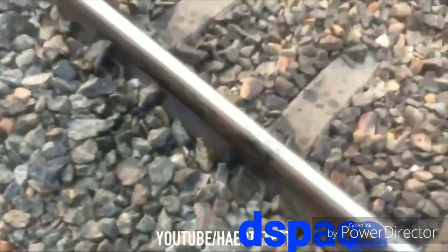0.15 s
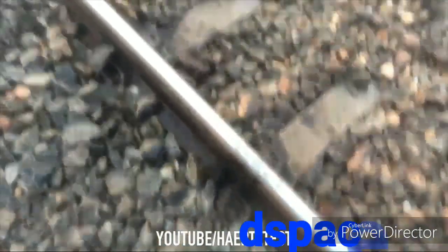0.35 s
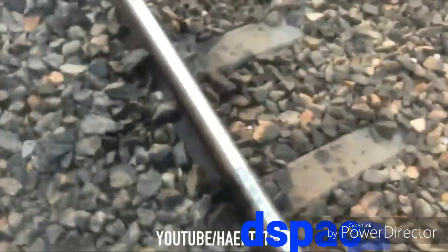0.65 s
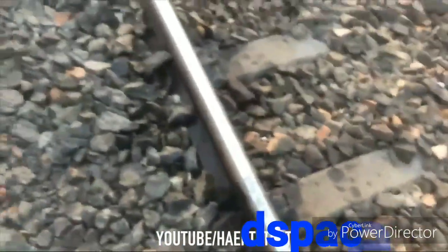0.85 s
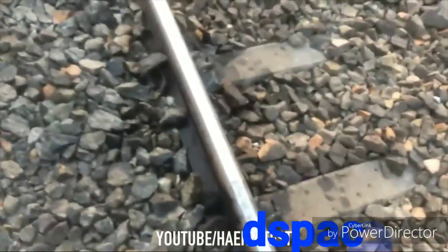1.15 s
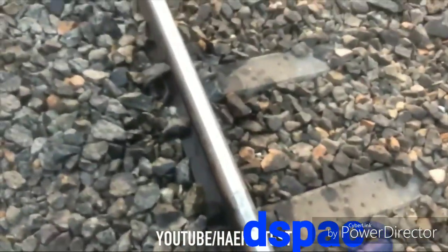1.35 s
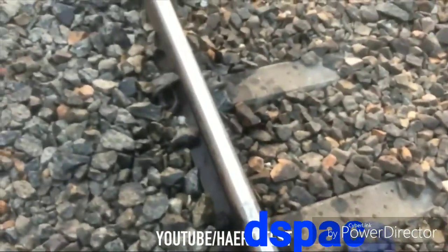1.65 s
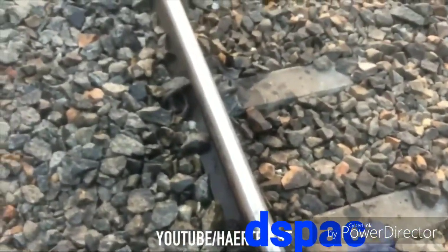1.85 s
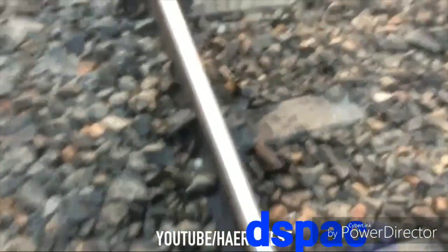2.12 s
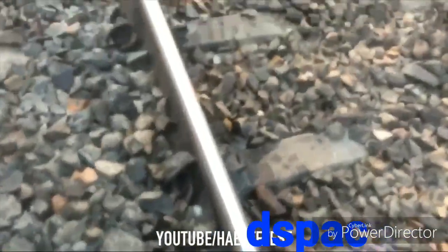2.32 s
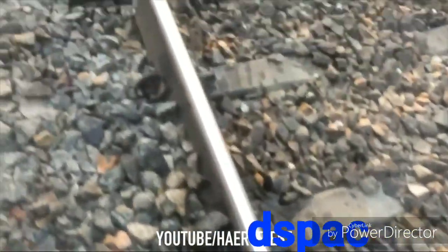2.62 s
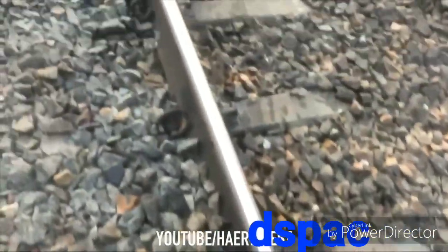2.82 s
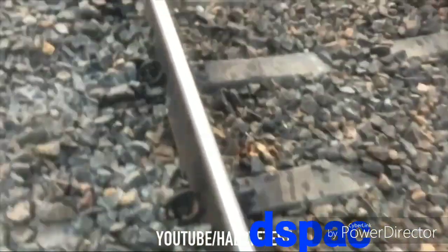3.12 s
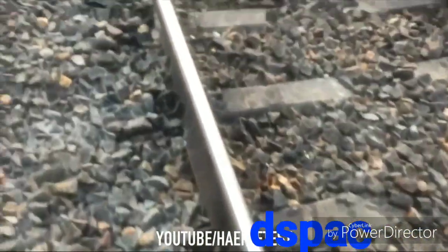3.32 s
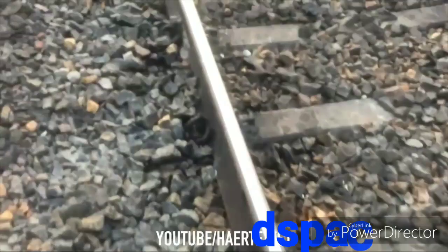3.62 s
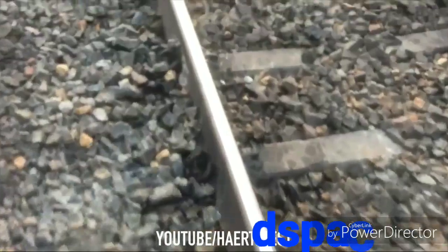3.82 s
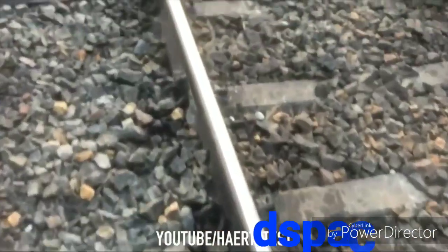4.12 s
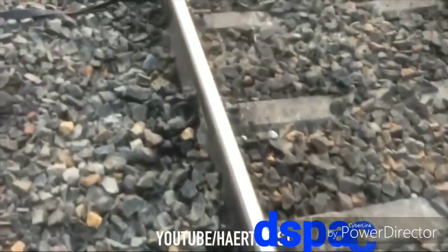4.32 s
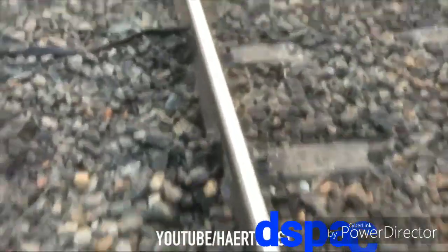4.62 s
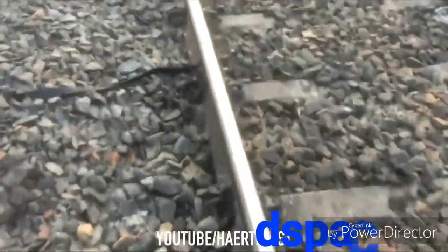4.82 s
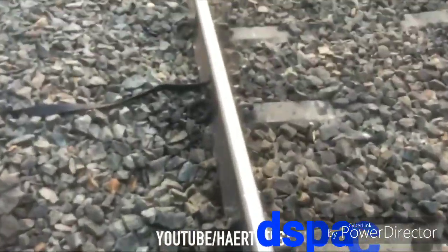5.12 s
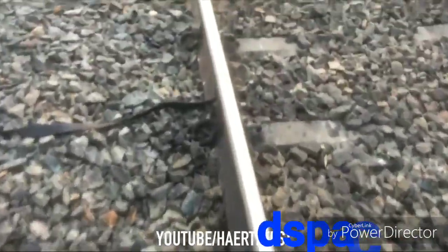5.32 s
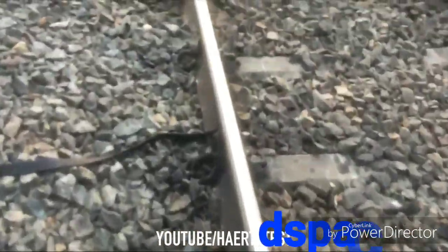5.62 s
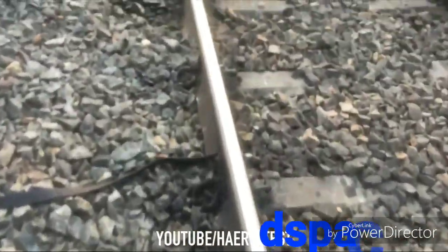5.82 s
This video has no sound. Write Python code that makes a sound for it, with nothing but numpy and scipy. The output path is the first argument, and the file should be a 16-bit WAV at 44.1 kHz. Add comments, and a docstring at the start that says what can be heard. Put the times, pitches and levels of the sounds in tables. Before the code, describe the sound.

Slow, crunching steps on loose railway ballast, stones knocking and grinding close to the microphone, with light wind buffeting and a faint distant engine.

```python
"""Beside a railway, outdoors: slow steps on loose ballast, close to a hand-held microphone.
Stones slip, knock, grind and rock underfoot, noisy or impulsive forces driving damped resonances; brief
narrow-band rings, some very high, lie over them. Air buffets the microphone in short pressure swings
over a low, gusting rumble of filtered noise. Behind lie a distant engine, three wavering harmonics,
and a faint steady background of coloured noise: a low murmur with a little hiss."""
import sys
import numpy as np
from scipy import signal
from scipy.fft import rfft, irfft
from scipy.io import wavfile
from scipy.ndimage import uniform_filter1d

SR = 44100
rng = np.random.default_rng(int(sys.argv[2]) if len(sys.argv) > 2 else 0)


def bounce(signal):
    """Save signal as a 16-bit WAV file at the path given by the first command-line argument."""
    frames = np.transpose(np.atleast_2d(signal))
    limited = np.clip(frames, -1, 1)
    pcm = np.round(limited * 32767).astype(np.int16)
    wavfile.write(sys.argv[1], SR, pcm)


N = 262395  # length in samples
TAPS = 2048  # length of one contact sound in samples
HZ = np.fft.rfftfreq(TAPS, 1 / SR) + 1  # the offset keeps the logarithm finite

# A stone slips over its neighbours. Each row: snap time in seconds, energy in dB, pitch in Hz,
# thud in dB re the ring, grit in dB re the ring, decay of the chatter in seconds.
SLIPS = [(0.0272, -17.5, 2800, -12, 3, 0.0034), (0.048, -28.5, 1820, -10, -11, 0.006),
         (0.1728, -15, 2970, 12, 6.5, 0.0039), (0.1866, -23, 3130, 4.5, 5.5, 0.0068),
         (0.2851, -19, 2180, -29, -32, 0.0045), (0.3433, -20, 2500, 1, -19, 0.0027),
         (0.4772, -3, 1970, -7.5, -4.5, 0.0031), (0.5105, -14.5, 2360, -9.5, -17, 0.004),
         (0.5738, -23.5, 2350, 3.5, 10, 0.0031), (0.6171, -27.5, 4500, -6, -10, 0.0047),
         (0.6589, -22.5, 2340, -19, -7, .0021), (0.6927, -13.5, 1690, -14, 1.5, 0.0025),
         (0.7117, -18.5, 1770, -27, 1, 0.00081), (0.782, -14, 1900, -34, -14, 0.0064),
         (0.8517, -15, 2830, -25, -23, 0.00076), (0.8564, -8.5, 3130, -14.5, -6, 0.0021),
         (0.94, -13, 2700, -15, -11, 0.0096), (0.948, -12, 2200, -12, -5, 0.0056),
         (0.977, -27, 3410, -15, -19, 0.00099), (1.3704, -16, 2060, -4, -2.5, 0.0036),
         (1.617, -35.5, 3560, -25, -8, 0.0022), (1.703, -23, 3440, -8, -14, 0.0032),
         (1.7518, -23, 1860, -3, 7, 0.0016), (1.8175, -13, 1500, -8, 9.5, 0.0018),
         (1.838, -23, 3620, -8, -11, .0022), (2.1802, -14, 2290, -23, -4.5, 0.0042),
         (2.219, -13.5, 2250, -11, -3, 0.0024), (2.2538, -23, 1970, -5, -4, 0.0031),
         (2.28, -17.5, 2280, -6.5, -16, 0.0068), (2.3337, -15, 2150, -26, -5.5, 0.0092),
         (2.399, -19, 2880, -41, -22, .0047), (2.449, -16, 2030, -13, -20, 0.00075),
         (2.556, -17, 1984, -8, -9, 0.003), (2.6563, -20.5, 2520, -16, -10, 0.0031),
         (2.7086, -23.5, 2400, -17, -12, .0026), (2.7493, -13, 2160, -22, -1, 0.0075),
         (2.7777, -24, 2310, -18, -16, 0.0037), (3.054, -21, 3500, -20, 16, .0032),
         (3.0748, -9, 2430, -11, -0.5, 0.0017), (3.0799, -4.5, 2830, -7, 1, 0.0053),
         (3.1072, -8.5, 2430, -6.5, -3, 0.01), (3.3077, -23.5, 2400, -18, 0, 0.003),
         (3.3208, -27, 3860, -8, -22.5, 0.0035), (3.626, -21.5, 3170, -5, 10, 0.00031),
         (3.7751, -27, 2166, -8, 4, 0.001), (3.928, -20, 2350, -2, -11, .0075),
         (3.9897, -27, 2240, -23, 5, 0.0012), (4.4032, -24, 2124, -31, 7, 0.0036),
         (4.435, -18, 2400, -32, 6.5, 0.009), (4.506, -26.5, 2380, -26, 5, 0.00063),
         (4.5196, -21, 2180, -37, 2, 0.0029), (4.5714, -15, 3060, -19, -2, 0.0025),
         (4.6317, -18.5, 2710, -4.5, -8, 0.0038), (4.6445, -13.5, 2520, -10.5, -5.5, 0.0055),
         (4.7349, -15.5, 2120, -8, -8, 0.0073), (5.222, -24, 2430, -9, 3.5, 0.006),
         (5.3188, -20.5, 2730, -45, -2, 0.0024), (5.3655, -20, 2510, -30, 0.5, 0.00074),
         (5.3983, -14.5, 2200, -7.5, -6, 0.0079), (5.4084, -12.5, 2470, -10.5, 2, 0.0023),
         (5.425, -14.5, 3130, -11, -2, 0.0052), (5.4568, -20.5, 2700, -7, -14, 0.0035),
         (5.5467, -24.5, 2270, -10, -5.5, 0.0043), (5.6277, -17, 3200, -15, 7.5, 0.0015)]


def crunches():
    """Stick-slip friction: the big slips of each step."""
    out = np.zeros(N)
    for row in SLIPS:
        add(out, *slip(*row))
    return out


def slip(s, db, hz, thud_db, grit_db, decay, sharpness=0.92, tail_db=-27, tail_decay=0.023, crack_db=-23):
    """Stick-slip: a contact creeps, snaps, then chatters; the shorter the slip, the stronger its snap."""
    snap, snap_fade_s, creep = 0.44, 0.003, 0.42  # creep is the build-up time in units of the decay
    overtone = 2.282  # the grit rings this many times above the stone's own pitch
    t = (np.arange(TAPS) - TAPS // 4) / SR
    chatter = rng.standard_normal(TAPS) * (rng.random(TAPS) < 0.3)
    after = np.maximum(t - decay / 2, 0)
    build = np.exp(np.minimum(t - decay / 2, 0) / (creep * decay))
    fall = np.exp(-after / decay) + gain_of(tail_db) * np.exp(-after / tail_decay)
    force = chatter * build * fall
    force /= np.linalg.norm(force)
    force += (t == 0) * 2 * snap * np.exp(-decay / snap_fade_s)
    body = stone(hz, sharpness, thud_db, grit_db, overtone * hz, crack_db, ripple_db=2.6)
    sound = signal.fftconvolve(colourless(force), body)
    return s + t[0], gain_of(db) * sound / np.linalg.norm(sound)


def colourless(force, size=44):
    """Spectral whitening: chatter favours no pitch, so its broad spectrum is evened and its grain kept."""
    power = uniform_filter1d(abs(rfft(force)) ** 2, size=size)
    inverse = ring((power + power.mean() / 20) ** -0.5)
    force = signal.fftconvolve(force, inverse)[:TAPS]
    return force / np.linalg.norm(force)


# Spectra of the thud in the bed and the crack at the contact.
# Each row: frequency in Hz, relative level in dB per Hz.
THUD_SPECTRUM = [(60, -18.5), (300, -2.5), (520, -7), (1050, -4.5), (2000, -10.5), (6000, -42),
                 (12000, -85)]
CRACK_SPECTRUM = [(1000, -28), (6000, -7.5), (10500, 1), (13000, -5.5), (15500, -16)]


def stone(hz, sharpness, thud_db, grit_db, grit_hz, crack_db, ripple_db):
    """Power summation: a jolted stone's ring, a thud in the bed, bright grit and a fine contact crack."""
    body = damped(hz, sharpness)
    thud = gain_of(thud_db) * read(THUD_SPECTRUM)
    grit = gain_of(grit_db) * damped(grit_hz, 1.86)
    crack = gain_of(crack_db) * read(CRACK_SPECTRUM)
    magnitude = np.sqrt(body ** 2 + thud ** 2 + grit ** 2 + crack ** 2)
    return ring(magnitude * facets(ripple_db))


def damped(hz, sharpness, contact=2.2, top_hz=13500):
    """Damped resonance: a broad spectral peak; the finite contact time cuts off what lies far above."""
    resonance = 1 + (sharpness * (HZ / hz - hz / HZ)) ** 2
    contact_loss = 1 + (HZ / hz / contact) ** 4
    top_loss = 1 + (HZ / top_hz) ** 8
    return evened(1 / (resonance * contact_loss * top_loss))


def facets(ripple_db):
    """Modal irregularity: each stone's own shape gives its own close-set spectral peaks and valleys."""
    bumps = uniform_filter1d(uniform_filter1d(rng.standard_normal(len(HZ)), size=20), size=14)
    return gain_of(ripple_db * evened(bumps - uniform_filter1d(bumps, size=60)))


# One stone strikes another. Each row: strike time in seconds, energy in dB, pitch in Hz.
STRIKES = [(0.2552, -17, 2240), (0.2595, -16, 2080), (0.2914, -7.5, 3030), (0.3285, -26, 1490),
           (0.7902, -21, 3020), (1.7269, -15.5, 2560), (2.454, -3.5, 2040), (2.4745, -8.5, 2316),
           (2.484, -13.5, 1970), (2.4955, -8.5, 2010), (2.51, -21, 1820), (2.5283, -21, 1950),
           (2.6059, -19.5, 1740), (3.1108, 1, 2455), (3.1292, -6, 2360), (3.1422, -6.5, 2400),
           (3.1556, -16, 2150), (3.184, -18, 2320), (4.1198, -27.5, 2420), (4.875, -39, 2380),
           (5.273, -28.5, 1540)]


def knocks(sharpness=1.4, scatter_db=-13, scatter_decay=0.01, thud_db=-23):
    """Impulse response: single clean contacts, each trailed by its scatter off the stones around."""
    out, t = np.zeros(N), np.arange(TAPS) / SR
    for s, db, hz in STRIKES:
        force = rng.standard_normal(TAPS) * np.exp(-t / scatter_decay)
        force *= gain_of(scatter_db) / np.linalg.norm(force)
        force[0] += 1  # the clean strike
        body = stone(hz, sharpness, thud_db, grit_db=-39.5, grit_hz=7000, crack_db=-35.5, ripple_db=1.5)
        knock = signal.fftconvolve(force, body)
        add(out, s, gain_of(db) * knock / np.linalg.norm(knock))
    return out


# Spectra of the ground pebbles and grit. Each row: frequency in Hz, relative level in dB per Hz.
PEBBLE_SPECTRUM = [(100, -18), (300, -2), (700, -5.5), (1300, -2), (2300, -2.5), (4000, -9.5),
                   (6000, -29.5), (12000, -33.5)]
GRIT_SPECTRUM = [(1000, -38.5), (3000, 5), (6500, 8), (8500, -1.5), (11000, -4.5), (13000, -21),
                 (15000, -24.5)]


def grinding(wash_db=-10, trim_db=-1, count=16):
    """Shot noise: hundreds of tiny slips a second, shared among many stones of different colour."""
    slips_per_s, spread_db, decay_s = 800, 6.5, 0.0013
    pebble_load, grit_load = load()
    t = np.arange(TAPS) / SR
    sizes = gain_of(spread_db * np.minimum(rng.exponential(1, N), 3))
    slips = sizes * (rng.random(N) < slips_per_s / SR)
    which, bed = rng.integers(0, count, N), np.zeros(N)
    for k in range(count):
        burst = rng.standard_normal(TAPS) * np.exp(-t / decay_s)
        colour = ring(facets(ripple_db=4.5))
        grain = evened(signal.fftconvolve(burst, colour)[:TAPS])
        bed += signal.oaconvolve(slips * (which == k), grain)[:N]
    bed = evened(bed) + gain_of(wash_db) * rng.standard_normal(N)
    pebbles = pebble_load * shared(coloured(bed, PEBBLE_SPECTRUM))
    grit = grit_load * shared(coloured(bed, GRIT_SPECTRUM))
    return gain_of(trim_db) * (pebbles + grit)


def shared(x):
    """Load sharing: the slips of the moment divide the foot's load, so their joint power stays even."""
    return x / np.sqrt(uniform_filter1d(x ** 2, size=1500) + 1e-9)


# A sole bears down and grinds the small stones. Each row: start in seconds,
# time from start to release in seconds, pebble load in dB, grit load in dB (loads before any trim).
SOLE_PRESSES = [(0.0, 0.48, -72, -72.5), (0.121, 0.073, -67, -64.5), (0.252, 0.037, -49.5, -82),
                (0.344, .04, -62, -71), (0.486, 0.074, -57.5, -60), (0.555, 0.16, -65, -69),
                (0.684, 0.073, -51, -71), (0.786, 0.16, -51, -62.5), (1.352, 0.02, -54, -72),
                (1.73, 0.072, -61.5, -79), (1.82, 0.04, -60.5, -69), (2.186, 0.12, -55.5, -66),
                (2.328, 0.14, -55, -54.5), (2.479, 0.074, -54, -72), (2.524, 0.051, -49.5, -66),
                (2.658, .11, -71.5, -70), (2.938, 0.034, -58, -57.5), (3.032, 0.059, -63, -56.5),
                (3.106, 0.059, -49, -62), (3.193, 0.12, -58.5, -65), (3.427, 0.18, -84, -72),
                (3.589, .10, -61, -64), (3.721, 0.069, -64.5, -64.5), (3.872, 0.28, -66.5, -92),
                (4.329, 0.01, -68, -60), (4.386, 0.071, -62, -61), (4.538, .12, -55.5, -49.5),
                (4.686, 0.057, -51, -56.5), (4.773, 0.072, -62.5, -84), (4.87, 0.15, -77, -81.5),
                (5.399, 0.089, -59, -79), (5.49, 0.21, -68.5, -79.5)]


def load():
    """Envelope of a varying load: weight comes on quickly, holds, then the stones settle."""
    attack_s, release_s = 0.0058, 0.02
    t, power = np.arange(N) / SR, np.zeros((2, N))
    for s, hold, pebbles_db, grit_db in SOLE_PRESSES:
        attack = np.clip((t - s) / attack_s, 0, 1)
        release = np.exp(-np.maximum(t - s - hold, 0) / release_s)
        power += (gain_of([[pebbles_db], [grit_db]]) * attack * release) ** 2
    return np.sqrt(power)


def settling(gap_s=0.024, over_load_db=21, follow=0.8, spread_db=7.0, pitch_hz=2350, slip_s=0.002, count=300):
    """Load-driven stick-slip: smaller stones give way unevenly, harder when the sole presses harder."""
    light_load_db = -60  # reference for the compressed load
    out, weight_db = np.zeros(N), 20 * np.log10(np.hypot(*load()) + 1e-9)
    draws = rng.uniform(-1.1, 1, (count, 5))
    for k, (place, size, pitch, grit, length) in enumerate(draws):
        s = (k + 1 + place / 2) * gap_s
        if s < N / SR and weight_db[int(s * SR)] > -90:  # silent without load
            load_db = light_load_db + follow * (weight_db[int(s * SR)] - light_load_db)
            db = load_db + over_load_db + spread_db * size
            hz = pitch_hz * np.exp(0.22 * pitch)
            add(out, *slip(s, db, hz, thud_db=-12, grit_db=-1.5 + 4 * grit, decay=slip_s * 2 ** length))
    return out


# A stone rocks to rest. Each row: time of the first tick in seconds,
# gap after the first tick in seconds, energy of the first tick in dB.
ROCKING_STONES = [(1.0969, 0.026, -33), (1.265, 0.021, -36), (3.753, .029, -34.5)]


def rocking(count=4, rise_db=0.14):
    """Repeated impact: a freed stone tips edge to edge in slowing ticks of nearly equal strength."""
    out, slowing, tick_s = np.zeros(N), 1.16, 0.0019  # an exponent above one widens the gaps
    for s, gap, db in ROCKING_STONES:
        for k in range(count):
            tick = slip(s + k ** slowing * gap, db + k * rise_db, hz=2150, thud_db=-8, grit_db=-3, decay=tick_s)
            add(out, *tick)
    return out


# Brief narrow-band rings, some very high, over the stone sounds. Each row: start in seconds,
# energy in dB, pitch in Hz, 60 dB decay time of the driving noise in seconds.
NARROW_RINGS = [(0.856, -16.5, 6960, 0.024), (1.85, -33, 5270, 0.1), (1.878, -28, 5150, 0.04),
                (2.385, -23, 10440, 0.067), (2.755, -29.5, 11900, 0.1), (2.874, -19.5, 2246, 0.1),
                (2.874, -27.5, 11700, 0.065), (3.056, -17, 2355, 0.05), (3.111, -23, 11130, 0.05),
                (3.905, -23, 4830, 0.024), (4.571, -19, 6500, 0.088), (4.825, -20, 7460, 0.011),
                (4.845, -31, 8000, 0.02), (5.003, -28, 9100, 0.026)]


def narrow_rings():
    """Forced resonance: one short-lived mode, started by an impulse and kept going by decaying noise."""
    noise_gain, ring_t60 = 0.3, 0.0055  # noise relative to the impulse; 60 dB decay time in s
    out, t = np.zeros(N), np.arange(2 * TAPS) / SR
    for s, db, hz, t60 in NARROW_RINGS:
        force = noise_gain * rng.standard_normal(len(t)) * np.exp(-np.log(1000) * t / t60)
        force[0] += 1
        envelope = np.exp(-np.log(1000) * t / ring_t60) * (1 - np.exp(-t * hz / 2))
        sound = signal.fftconvolve(force, np.sin(2 * np.pi * hz * t) * envelope)
        add(out, s, gain_of(db) * sound / np.linalg.norm(sound))
    return out


# Puffs of air on the microphone. Each row: centre time in seconds, amplitude in dB.
PUFFS = [(1.572, -53), (1.88, -40), (1.96, -35), (2.093, -36.5), (2.286, -27), (2.309, -26.5), (2.428, -29),
         (2.607, -38.5), (2.688, -35.5), (2.799, -40), (3.267, -43), (3.423, -46.5), (3.681, -40),
         (3.921, -39.5), (4.07, -31), (4.105, -33.5), (4.136, -41), (4.194, -29.5), (5.512, -35.5),
         (5.76, -34)]
# Swells of air. Each row: time of the height in seconds,
# half width to 1/e of the power in seconds, level in dB before the rumble trim.
AIR_SWELLS = [(2.0, 0.065, -53), (2.34, .11, -38.5), (2.68, 0.099, -51.5), (3.31, 0.22, -55.5),
              (4.139, .1, -46), (4.71, .09, -54.5), (5.55, 0.23, -54.5)]


def wind(puff_hz=90, cycles=0.45, lumps_db=3, rumble_db=-3, eddy_db=1, eddy_spread_db=3,
         eddy_gap_s=0.056, count=120):
    """Turbulent pressure: swings with no net push over a low rumble; small ones follow the gusts' level."""
    calm_db = -70.5  # air between gusts, before the rumble trim
    t, now = np.arange(-TAPS, TAPS) / SR, np.arange(N) / SR
    rumble_spectrum = [(20, -17.5), (65, 8.5), (120, -3), (220, -24), (500, -37.0), (2000, -84)]  # Hz, dB per Hz
    rumble = coloured(rng.standard_normal(N), rumble_spectrum)
    power = gain_of(calm_db) ** 2
    for s, width, db in AIR_SWELLS:
        power = power + gain_of(db) ** 2 * np.exp(-((now - s) / width) ** 2)
    lumpy = evened(rumble * gain_of(lumps_db * wander(rate_hz=180)))
    out = gain_of(rumble_db) * np.sqrt(power) * lumpy
    place, size = rng.uniform(-1, 1, (count, 2)).T
    times = (np.arange(count) + 1 + place / 2) * eddy_gap_s
    levels = 10 * np.log10(np.interp(times, now, power)) + eddy_db + eddy_spread_db * size
    balance = np.exp(-2 * (np.pi * cycles) ** 2)  # cancels the net push
    for s, db in list(PUFFS) + list(zip(times, levels)):
        turns = puff_hz * t * np.exp(0.1 * rng.standard_normal())
        swing = (np.cos(2 * np.pi * turns) - balance) * np.exp(-0.5 * (turns / cycles) ** 2)
        add(out, s + t[0], gain_of(db) * swing)
    return out


# Distant engine. Each row: time in seconds, mean pitch in Hz, level in dB.
ENGINE_DRONE = [(0, 158.9, -65), (.35, 148, -63), (.8, 153, -69.5), (1.5, 155.2, -69), (3, 151.1, -69.5),
                (4.5, 153.5, -71.5), (4.95, 143.9, -64), (5.2, 147.3, -57), (5.4, 143.7, -66),
                (5.95, 143.9, -73)]


def engine(waver=0.02, second_db=-21, fourth_db=-24):
    """Harmonic series: a far engine's first, second and fourth orders waver in the open air."""
    hz, db = curves(ENGINE_DRONE)
    angle = 2 * np.pi * np.cumsum(hz * (1 + waver * wander(rate_hz=29))) / SR
    second = gain_of(second_db) * np.sin(2 * angle)
    fourth = gain_of(fourth_db) * np.sin(4 * angle)
    return gain_of(db) * evened(np.sin(angle) + second + fourth)


# Spectrum of the steady background. Each row: frequency in Hz, relative level in dB per Hz.
BACKGROUND_SPECTRUM = [(20, -27), (70, -10), (140, 3.5), (250, -10), (500, -15), (1200, -21.5), (4000, -27),
                       (7100, -27.5), (7800, -13), (8400, -30), (13000, -30), (15500, -42)]


def background(level_db=-66):
    """Stationary coloured noise: a low murmur near 140 Hz with a little hiss near 7.8 kHz."""
    return gain_of(level_db) * coloured(rng.standard_normal(N), BACKGROUND_SPECTRUM)


def gain_of(db):
    """Logarithmic level: decibels to amplitude."""
    return 10 ** (np.asarray(db) / 20)


def evened(x):
    """Normalisation: scales to an rms of one."""
    return x / np.sqrt(np.mean(x ** 2) + 1e-20)


def read(points, hz=HZ):
    """Spectral envelope: amplitudes interpolated on a log-frequency axis, with an rms of one."""
    f, db = np.transpose(points)
    return evened(gain_of(np.interp(np.log(hz), np.log(f), db)))


def curves(rows):
    """Linear interpolation: each column of a time table, at every sample."""
    s, *columns = np.transpose(rows)
    return [np.interp(np.arange(N) / SR, s, c) for c in columns]


def add(mix, s, sound):
    """Superposition: adds a sound into the mix at a time in seconds."""
    part = mix[max(round(s * SR), 0):][:len(sound)]
    part += sound[:len(part)]


def coloured(x, points):
    """Linear filtering: weights a long signal by a spectrum table."""
    return evened(irfft(rfft(x) * read(points, np.fft.rfftfreq(N, 1 / SR) + 1), N))


def wander(rate_hz):
    """Band-limited noise: slow random motion with an rms of one."""
    slow = np.fft.rfftfreq(N, 1 / SR) < rate_hz
    return evened(irfft(rfft(rng.standard_normal(N)) * slow, N))


def ring(gain):
    """Minimum phase: the causal impulse response of a magnitude spectrum."""
    both_sides = np.r_[gain, gain[-2:0:-1]]
    log_gain = np.log(np.maximum(both_sides, gain.max() * 1e-5))
    return irfft(np.exp(np.conj(signal.hilbert(log_gain)))[:len(gain)])


def scene():
    """Superposition: stones underfoot, narrow rings, wind and the far surroundings."""
    stones = crunches() + knocks() + grinding() + settling() + rocking()
    return (stones + narrow_rings() + wind() + engine() + background())[None]


def record(dry):
    """Band limitation: the recorder's linear-phase low-pass at 15750 Hz."""
    low_pass = signal.firwin(511, 15750, window=("kaiser", 9), fs=SR)
    return signal.oaconvolve(dry, low_pass[None], "same")


dry = scene()
out = record(dry)
bounce(out)
```